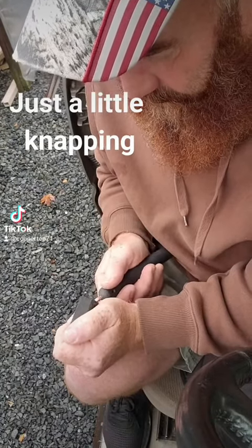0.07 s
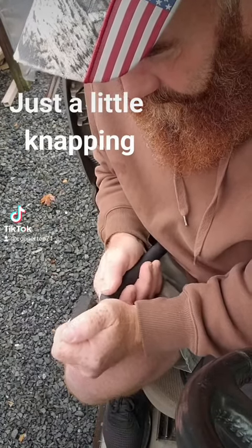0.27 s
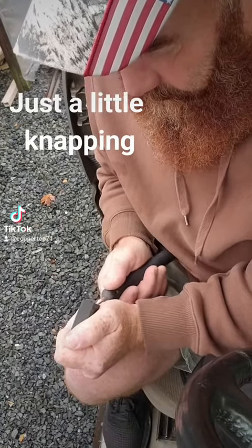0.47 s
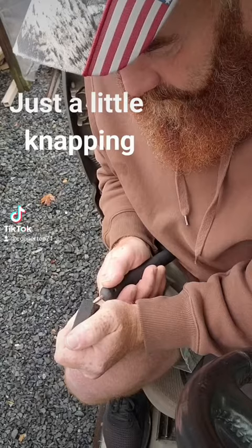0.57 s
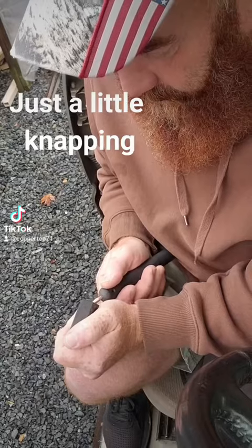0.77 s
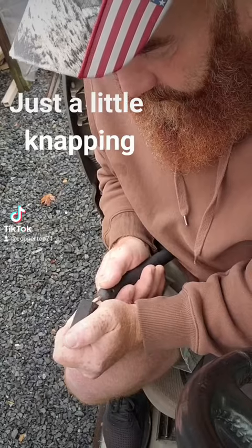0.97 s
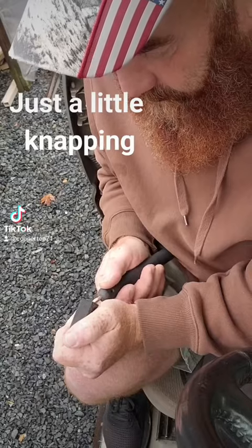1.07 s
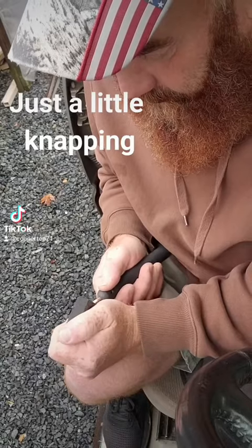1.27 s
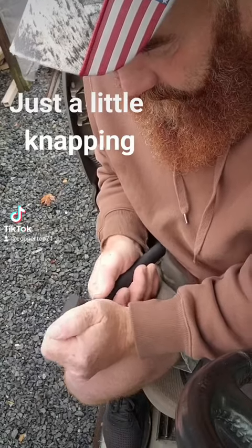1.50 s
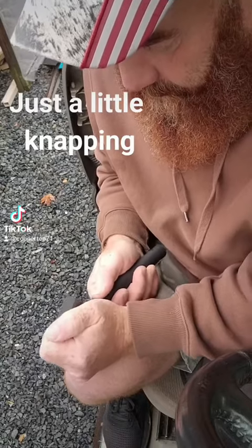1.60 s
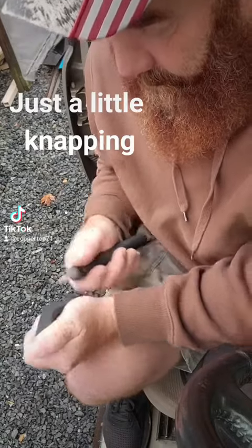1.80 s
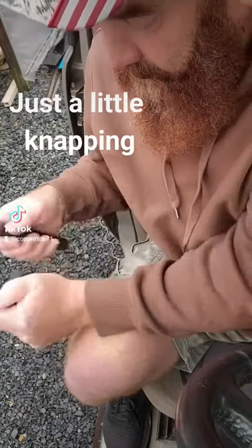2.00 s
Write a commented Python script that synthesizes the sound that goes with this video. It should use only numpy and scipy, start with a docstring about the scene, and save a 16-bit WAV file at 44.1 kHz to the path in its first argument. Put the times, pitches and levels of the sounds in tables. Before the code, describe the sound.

Two brief, bright cracks of stone flaking under a hand tool come just over a second apart, near the microphone outdoors. Light ticks and scuffs follow each, with a low hum and a very faint distant bird behind.

```python
"""Pressure flaking of flint, outdoors

Two flakes snap off a hand-held flint under a pressure tool: damped stone modes, a flake ring and crackling noise.
Each snap adds low modes for the knock into the padded hand and the jolt of hands and knee, then reflections.
Shaped noise makes the scuffs, the sleeve rustle and the outdoor air; short rings with grit make the ticks.
Behind are a wavering low hum and a far bird, whistled as gliding sines.
"""
import sys
import numpy as np
from scipy import signal
from scipy.fft import rfft, irfft
from scipy.io import wavfile
from scipy.ndimage import uniform_filter1d

SR = 44100
rng = np.random.default_rng(int(sys.argv[2]) if len(sys.argv) > 2 else 0)


def store_wav(level_fs):
    """Save 16-bit WAV to argv[1]."""
    pcm = np.round(np.clip(np.atleast_2d(level_fs), -1, 1) * 32767)
    wavfile.write(sys.argv[1], SR, pcm.T.astype(np.int16))


N = 90404  # samples


def amp(db):
    """Decibels to gain."""
    return 10 ** (np.asarray(db) / 20)


def unit(x):
    """Scales to an rms of one."""
    return x / np.sqrt(np.mean(x ** 2) + 1e-20)


def read(points, hz):
    """Interpolates a spectrum on a log-frequency axis."""
    f, value = np.transpose(points)
    return np.interp(np.log(hz + 1), np.log(f + 1), value)


def add(mix, start_s, sound):
    """Mixes a stereo sound in at a time, cut at the end of the mix."""
    start = max(round(start_s * SR), 0)
    part = mix[:, start:][:, :sound.shape[1]]
    part += sound[:, :part.shape[1]]


def colour(x, points):
    """Filters a sound by a spectrum in dB."""
    size = x.shape[-1]
    gain = amp(read(points, np.fft.rfftfreq(size, 1 / SR)))
    return irfft(rfft(x) * gain, size)


def swell(t, rise_s, t60_s):
    """Straight rise, then exponential decay."""
    decay = np.exp(-np.log(1000) * np.maximum(t - rise_s, 0) / t60_s)
    return np.clip(t / rise_s, 0, 1) * decay


def ring(t, hz, rise_s, t60_s):
    """One damped mode."""
    return swell(t, rise_s, t60_s) * np.sin(2 * np.pi * hz * t)


def correlate(left, other, same):
    """Right-channel noise with a given likeness to the left."""
    return same * left + np.sqrt(1 - same ** 2) * other


# right minus left: freq_hz, level_db
GRIT_SIDE = [(300, 7), (1700, 8), (2400, 3), (3200, -13.5), (5000, -15.5), (8000, -23.5), (14000, -23.5)]


def grit(size, points, same):
    """Stereo noise of a given colour and left-right likeness; its treble favours the left."""
    left, other = colour(rng.standard_normal((2, size)), points)
    right = unit(correlate(left, other, np.clip(same, 0, 1)))
    return np.array([unit(left), colour(right, GRIT_SIDE)])


def grains(size, uneven_db):
    """An uneven level that changes about every half millisecond."""
    drift = unit(uniform_filter1d(rng.standard_normal(size), size=24))
    return unit(amp(uneven_db * np.clip(drift, -2, 2)))


# air spectrum: freq_hz, relative_db_per_hz
AIR_COLOUR = [(15, -56.5), (25, -26.5), (45, -6), (68, 1.5), (97, -19), (127, -12.5), (145, -25.5),
              (212, -17.5), (317, -28.5), (405, -27), (575, -29), (624, -27), (962, -39), (1330, -38.5),
              (1940, -28.5), (2610, -41.5), (4140, -46), (6920, -56.5), (16000, -56)]
# left-right likeness: freq_hz, likeness_ratio
AIR_SAME = [(60, 0.7), (180, 1), (550, 0.44), (1650, 0.08), (4970, 0.16), (15000, 0.03)]
# left minus right: freq_hz, level_db
AIR_SIDE = [(60, -3), (100, -5.5), (180, -6), (310, -5.5), (550, -5), (950, 0), (1650, -13), (2860, 3.5),
            (4970, 14), (8640, 0.5), (15000, 3)]
AIR_RMS_DB, PATCH_DB = -62.5, 1.01


def air():
    """Outdoor rumble and hiss: shaped noise with slightly drifting time-frequency patches."""
    frames, hz = N // 512 + 5, np.fft.rfftfreq(2048, 1 / SR)
    a, b, c, d, patches = rng.standard_normal((frames, len(hz), 5)).T
    patches = uniform_filter1d(patches, size=20, axis=0)  # across frequency
    patches = unit(uniform_filter1d(patches, size=8, axis=1))  # across time
    same = np.clip(read(AIR_SAME, hz), -1, 1)[:, None]
    half_side_db = read(AIR_SIDE, hz)[:, None] / 2
    left = a + 1j * b
    right = correlate(left, c + 1j * d, same)
    z = np.array([left * amp(half_side_db), right * amp(-half_side_db)])
    z *= amp(read(AIR_COLOUR, hz)[:, None] + PATCH_DB * patches)
    noise = signal.istft(z, nperseg=2048, noverlap=1536)[1][:, :N]
    return amp(AIR_RMS_DB) * unit(noise)


# distant machine: freq_hz, right_rms_db, waver_share
HUM = [(74, -64, .7), (119.8, -66, .2)]
HUM_LEFT_DB = -13.5  # re right


def hum(waver_hz=9):
    """Low machine tones; summed slow phasors waver their strength and phase."""
    t, out = np.arange(N) / SR, np.zeros(N)
    for hz, db, waver in HUM:
        phasors = rng.uniform(-1, 1, (16, 2))  # frequency share, phase in cycles
        drift = sum(np.exp(2j * np.pi * (waver_hz * f * t + p)) for f, p in phasors) / np.sqrt(16)
        tone = (1 - waver + waver * drift) * np.exp(2j * np.pi * hz * t)
        out += amp(db) * unit(tone.real)
    return amp([[HUM_LEFT_DB], [0]]) * out


# far bird: start_s, length_s, start_hz, end_hz, left_peak_db
WHISTLES = [(.02, .1, 3880, 4130, -80), (.83, .065, 3980, 4050, -81), (.915, .07, 4150, 4600, -85),
            (.99, .03, 4350, 4100, -82)]
BIRD_RIGHT_DB = -19  # re left


def whistle(length_s, start_hz, end_hz, db):
    """A far bird's thin note: one sine gliding straight in pitch."""
    size = round(length_s * SR)
    pitch_hz = np.linspace(start_hz, end_hz, size)
    note = np.sin(2 * np.pi * np.cumsum(pitch_hz) / SR)
    return amp(db) * np.sqrt(np.hanning(size)) * note * amp([[0], [BIRD_RIGHT_DB]])


# flint modes: freq_hz, t60_s, snap_1_relative_db, snap_2_relative_db
STONE = [(3030, .026, -33, -27.5), (3210, .0175, -40, -17.5), (3630, .016, -17, -19.5),
         (3810, .0058, -10.5, -12), (4030, .02, -26.5, -20), (4580, .008, -30, -20),
         (5180, .0028, -20, -28.5), (6050, .012, -31, -22.5)]
# stone, right minus left: freq_hz, level_db
STONE_SIDE = [(2500, -14), (3500, -13), (4200, -19.5), (6000, -23)]
RADIATES_ABOVE_HZ, STONE_DB = 2720, -1.5


def stone_ring(t, which, run_s):
    """Damped flint modes rise as the crack runs; the small stone radiates only treble."""
    modes = sum(amp(STONE_DB + dbs[which]) * ring(t, hz, run_s, t60_s) for hz, t60_s, *dbs in STONE)
    highpass = signal.butter(6, RADIATES_ABOVE_HZ, "high", fs=SR, output="sos")
    left = signal.sosfilt(highpass, modes)
    right = colour(np.pad(left, (0, len(t))), STONE_SIDE)[:len(t)]
    return np.array([left, right])


FLAKE_HZ, FLAKE_T60_S = 1753, 0.0257
FLAKE_DBS, FLAKE_LEFT_DB = (-34.5, -38.5), -12.5  # right per snap; left re right


def flake_ring(t, which, run_s):
    """The flake rings briefly as one damped mode."""
    return amp(FLAKE_DBS[which]) * amp([[FLAKE_LEFT_DB], [0]]) * ring(t, FLAKE_HZ, run_s, FLAKE_T60_S)


# fracture colour: freq_hz, relative_db
CRACKLE = [(300, -30.5), (1400, -20), (2300, -7), (3000, -4), (3600, 1.5), (4600, -3), (6000, -9),
           (7200, -9), (8500, -7), (11500, -16), (14500, -7), (16000, -9)]
CRACKLE_T60_S, CRACKLE_UNEVEN_DB = .009, 3
DIRECT_SAME = 0.52  # left-right likeness


def crackle(t, run_s):
    """Fracture noise in uneven grains, rising as the crack runs."""
    noise = grit(len(t), CRACKLE, DIRECT_SAME) * grains(len(t), CRACKLE_UNEVEN_DB)
    return noise * swell(t, run_s, CRACKLE_T60_S)


# near reflections: delay_s, gain_db
ECHOES = [(.00203, -16), (.00453, -20), (.00851, -21), (.0128, -19)]


def reflect(direct):
    """The direct snap plus its delayed, weaker copies."""
    out = direct.copy()
    for delay_s, db in ECHOES:
        add(out, delay_s, amp(db) * direct)
    return out


# scattered colour: freq_hz, relative_db
GRAVEL = [(300, -23), (1400, -21.5), (2400, -11.5), (3000, -5), (3500, 3), (4400, -5), (6000, -9.5),
          (7200, -14.5), (8500, -14.5), (11000, -21.5), (14500, -14.5), (16000, -20)]
SCATTER_DB, SCATTER_T60_S, SCATTER_RISE_S = -9, .066, .003
TAIL_DB, TAIL_T60_S = -36, .34
SCATTER_SAME, SCATTER_UNEVEN_DB = 0.14, 2.5


def gravel_scatter(t):
    """Gravel scatters the snap back as wide noise with a fast and a slow decay."""
    level = amp(SCATTER_DB) * swell(t, SCATTER_RISE_S, SCATTER_T60_S)
    level += amp(TAIL_DB) * swell(t, SCATTER_RISE_S, TAIL_T60_S)
    return level * grit(len(t), GRAVEL, SCATTER_SAME) * grains(len(t), SCATTER_UNEVEN_DB)


# tool into padded hand: freq_hz, t60_s, snap_1_relative_db, snap_2_relative_db
KNOCK = [(145.8, 0.049, 4.5, -0.5), (258, 0.085, -4.5, -3.5), (500, 0.024, -6, -10.5), (623, .03, -17, -3),
         (705.6, 0.06, -21.5, -6.5), (1000, 0.047, -2, -5.5), (1193, 0.018, -3, -4)]
KNOCK_RISE_CYCLES, KNOCK_LEFT_DB = 0.73, -6.5  # left re right


def knock(t, which):
    """The tool knocks dully into the padded hand: modes rising within a cycle."""
    modes = sum(amp(dbs[which]) * ring(t, hz, KNOCK_RISE_CYCLES / hz, t60_s) for hz, t60_s, *dbs in KNOCK)
    return amp([[KNOCK_LEFT_DB], [0]]) * modes


# hands and knee: freq_hz, t60_s, relative_db, delay_s
JOLT = [(54, .15, -1, .023), (78, .07, -5, .004), (40, .3, -11, .018)]
JOLT_RISE_S, JOLT_LEFT_DB = .004, -6.5  # left re right


def jolt(t):
    """Hands jolt against the knee: delayed, damped bass modes."""
    modes = sum(amp(db) * ring(t - delay_s, hz, JOLT_RISE_S, t60_s) for hz, t60_s, db, delay_s in JOLT)
    return amp([[JOLT_LEFT_DB], [0]]) * modes


# snaps: start_s, crack_run_s, crackle_gain_db, knock_gain_db, jolt_gain_db
SNAPS = [(.21598, .0015, -25.5, -45, -39), (1.50216, .0003, -22.5, -35, -36.5)]


def snap(which, run_s, crackle_db, knock_db, jolt_db):
    """The crack runs, stone and flake ring, the hands jolt and the surroundings answer."""
    t = np.arange(SR // 2) / SR
    direct = stone_ring(t, which, run_s) + flake_ring(t, which, run_s)
    direct += amp(crackle_db) * crackle(t, run_s)
    out = reflect(direct) + amp(crackle_db) * gravel_scatter(t)
    return out + amp(knock_db) * knock(t, which) + amp(jolt_db) * jolt(t)


# tool set on the edge: start_s, length_s, gain_db
SCUFFS = [(.46, .13, -79), (1.69, .13, -81), (1.91, .18, -80)]
# scuff and tick grit: freq_hz, relative_db
SCUFF_COLOUR = [(300, 5), (1500, -5.5), (2900, 4), (4000, -1.5), (5000, 8), (7000, -11), (10000, -21),
                (14000, -1), (16000, -34)]
# sleeve rustle as the hands part: start_s, length_s, gain_db
SLEEVE = (1.95, .17, -63)
# sleeve: freq_hz, relative_db
SLEEVE_COLOUR = [(30, -2), (80, 6.5), (250, -9), (600, -24), (1200, -43), (6000, -60)]


def scuff(length_s, db, points):
    """A short rub of tool or sleeve: coloured noise in uneven grains, swelling and fading."""
    size = round(length_s * SR)
    return amp(db) * np.hanning(size) * grains(size, uneven_db=1) * grit(size, points, DIRECT_SAME)


# tool and loose chips: start_s, freq_hz, gain_db
TICKS = [(.487, 2800, -73), (1.565, 3000, -66), (1.75, 2900, -77)]
TICK_RISE_S, TICK_T60_S, TICK_GRIT_DB = 0.0049, 0.037, -6


def tick(hz, db, right_db=-12):
    """A light touch on the stone: one short ring and a little grit."""
    t = np.arange(SR // 10) / SR
    tone = amp([[0], [right_db]]) * np.sin(2 * np.pi * hz * t)
    noise = amp(TICK_GRIT_DB) * grit(len(t), SCUFF_COLOUR, DIRECT_SAME)
    return amp(db) * swell(t, TICK_RISE_S, TICK_T60_S) * (tone + noise)


def scene():
    """Bird, snaps and handling over the outdoor background."""
    mix = air() + hum()
    for start_s, *row in WHISTLES:
        add(mix, start_s, whistle(*row))
    for which, (start_s, *row) in enumerate(SNAPS):
        add(mix, start_s, snap(which, *row))
    for start_s, *row in SCUFFS:
        add(mix, start_s, scuff(*row, SCUFF_COLOUR))
    for start_s, *row in TICKS:
        add(mix, start_s, tick(*row))
    start_s, *row = SLEEVE
    add(mix, start_s, scuff(*row, SLEEVE_COLOUR))
    return mix


EDGE_HZ = 16000


def record(dry):
    """The recorder's band limit: a linear-phase low-pass."""
    lowpass = signal.firwin(511, EDGE_HZ, window=("kaiser", 9), fs=SR)
    return signal.oaconvolve(dry, lowpass[None], "same")


dry = scene()
out = record(dry)
store_wav(out)
```